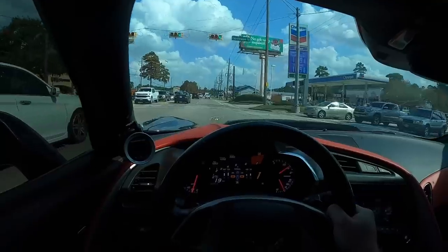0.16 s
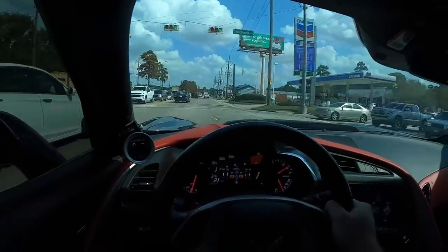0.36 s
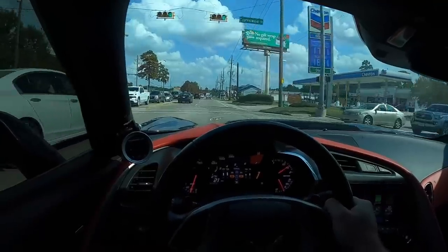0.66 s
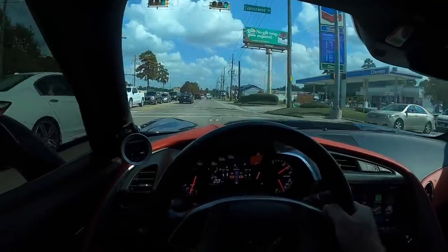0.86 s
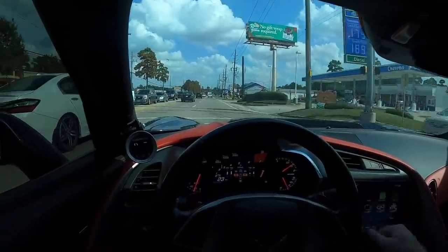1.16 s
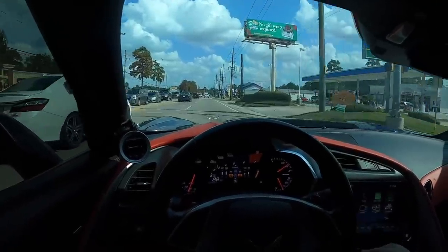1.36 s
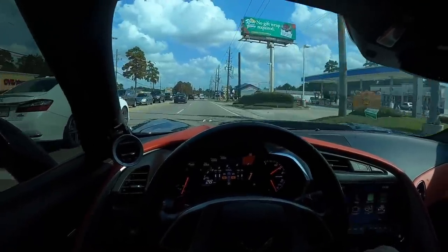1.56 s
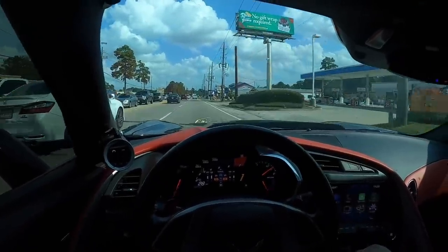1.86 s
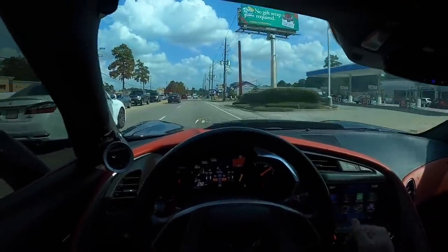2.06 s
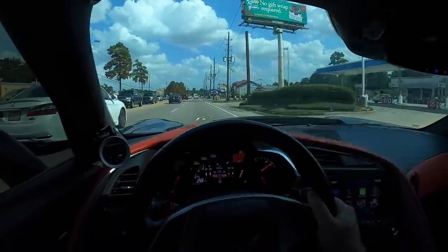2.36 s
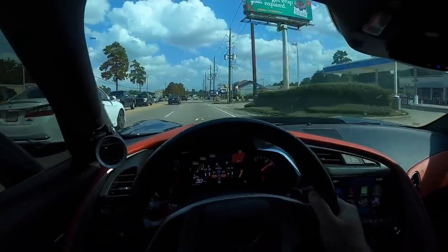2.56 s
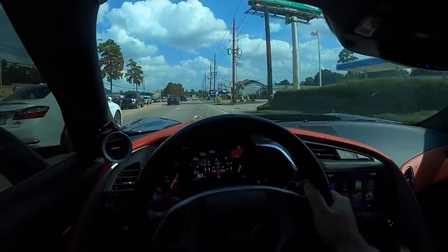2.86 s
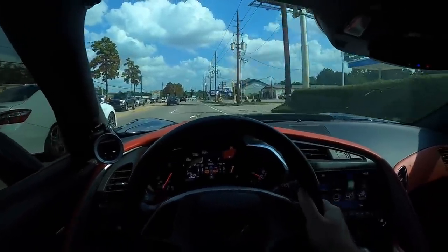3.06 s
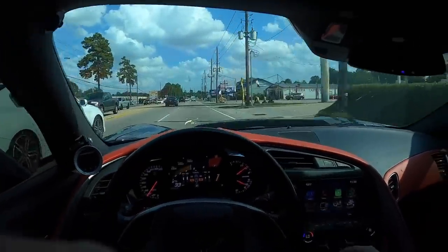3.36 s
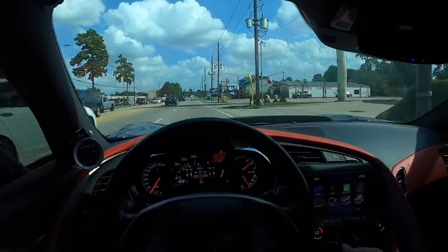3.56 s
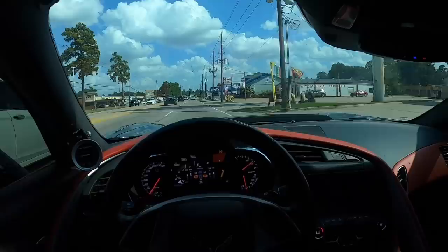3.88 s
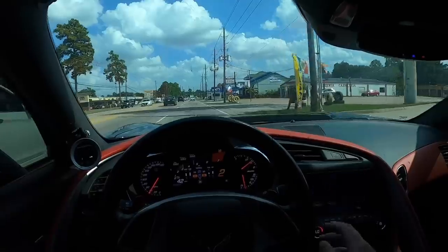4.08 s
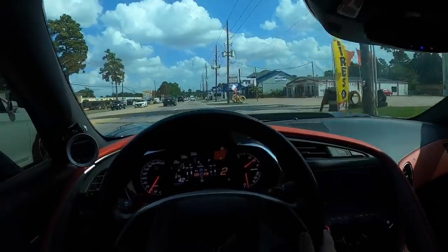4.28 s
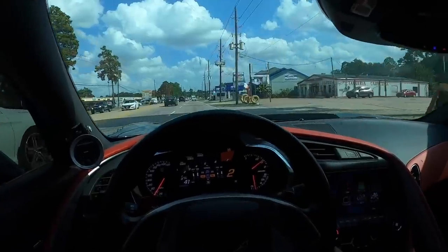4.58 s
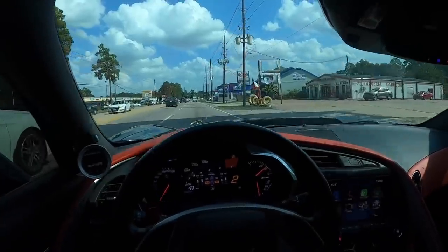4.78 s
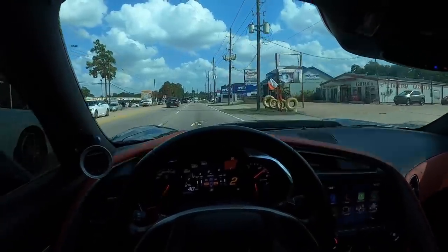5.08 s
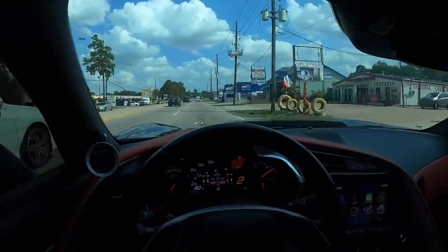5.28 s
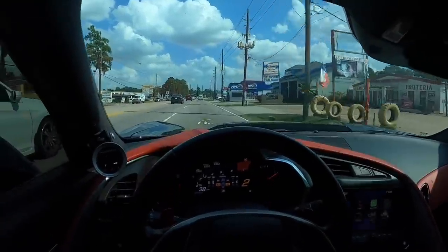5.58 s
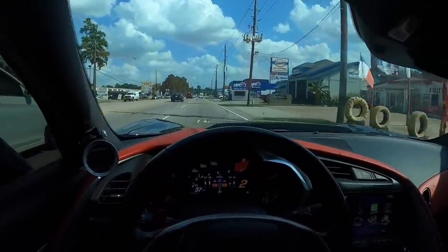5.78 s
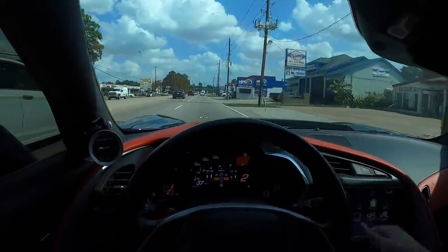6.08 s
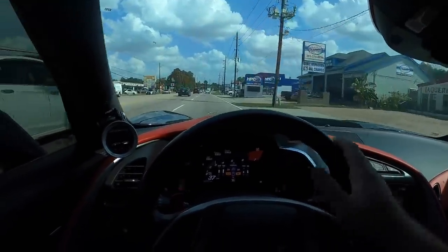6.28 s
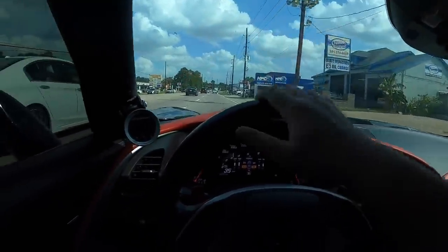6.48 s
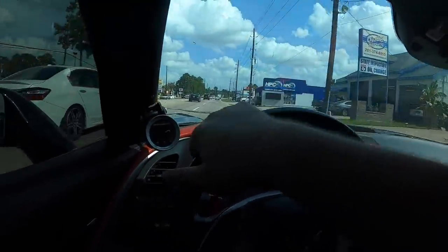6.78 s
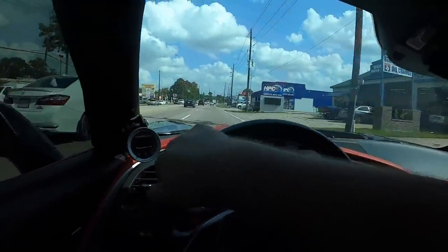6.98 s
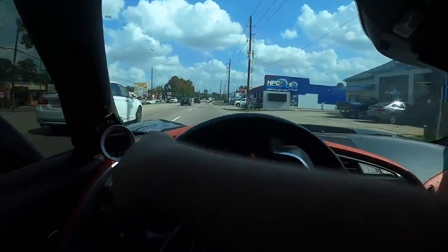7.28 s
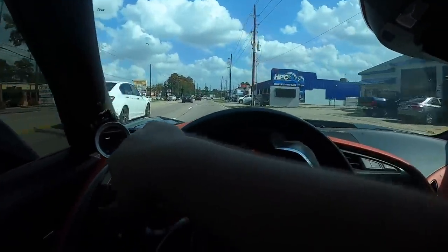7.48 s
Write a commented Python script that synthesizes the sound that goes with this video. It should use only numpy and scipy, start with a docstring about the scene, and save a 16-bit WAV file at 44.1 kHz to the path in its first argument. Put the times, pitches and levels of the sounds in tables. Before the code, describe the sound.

From inside a moving car's cabin, a deep V8 climbs steadily in pitch and breaks into a short, hard roar. It drops back for a gear change with a few muffled exhaust pops, then burbles along as it slows. Near the end it revs sharply twice in quick succession and runs down. Soft road rumble and a few faint plastic clicks sit behind the engine.

```python
"""A supercharged V8 heard from the driver's seat: it pulls in first gear, is floored, lifts off, shifts up,
coasts with a burble, gets two stabs of throttle and runs down. Exhaust pulses form engine orders that pass the
resonances of pipes and cabin, boom, and bark at full load. Each firing puffs out gas that sputters, roars and
hisses; low thuds come as the throttle shuts and the clutch takes up. Behind are blower whine, intake rush, trim
clicks, soft swishes and road rumble."""
import sys
import numpy as np
from scipy import signal
from scipy.io import wavfile
from scipy.ndimage import uniform_filter1d, minimum_filter1d

SR = 44100
rng = np.random.default_rng(int(sys.argv[2]) if len(sys.argv) > 2 else 0)


def output_pcm(signal):
    """Save a mono or channel-first signal as 16-bit PCM at the path in sys.argv[1].

    Samples are clipped to [-1, 1] before scaling.
    """
    pcm = np.clip(np.atleast_2d(signal).T, -1, 1) * 32767
    wavfile.write(sys.argv[1], SR, np.round(pcm).astype(np.int16))


N = 336968
TIME = np.arange(N) / SR
CRUISE_HZ, FIRM_THROTTLE, CYLINDER_COUNT = 190, .65, 8


def amp(db):
    """Decibels to gain."""
    return 10 ** (np.asarray(db) / 20)


def unit(x):
    """Scales to rms 1."""
    return x / np.sqrt(np.mean(abs(x) ** 2) + 1e-20)


def drift(t, rate_hz):
    """Smooth random wander, rms 1."""
    knots = signal.resample_poly(rng.standard_normal(1024), 8, 1)
    return unit(np.interp(t * rate_hz, np.linspace(0, 1024, len(knots)), knots))


def curves(rows, at):
    """A table's other columns, interpolated along its first."""
    axis, *columns = np.transpose(rows)
    return [np.interp(at, axis, column) for column in columns]


def spectrum(points, hz):
    """A (Hz, dB) table read on a log-frequency axis."""
    f, db = np.transpose(points)
    return np.interp(np.log(hz + 1), np.log(f + 1), db)


def modes_db(modes, hz):
    """Sum of bell-shaped peaks and notches."""
    return sum(db * np.exp(-.5 * ((hz - centre) / width) ** 2) for centre, width, db in modes)


def colour(x, db_at, size=16384):
    """Causal filter with gain db_at(hz)."""
    hz = abs(np.fft.fftfreq(size, 1 / SR))
    log_gain = np.log(amp(np.maximum(db_at(hz), -100)))
    response = np.fft.ifft(np.exp(np.conj(signal.hilbert(log_gain)))).real
    return signal.oaconvolve(x, response[:size // 2])[:len(x)]


def shaped(x, points):
    """Filters x by a (Hz, dB) table."""
    return colour(x, lambda hz: spectrum(points, hz))


def band_noise(n, hz, width_hz):
    """Noise through two resonators that follow hz, rms 1."""
    turn = np.exp(2j * np.pi * np.cumsum(hz * np.ones(n)) / SR)
    pole = np.exp(-np.pi * width_hz / SR)
    x = rng.standard_normal(n)
    for _ in range(2):
        x = (turn * signal.lfilter([1 - pole], [1, -pole], x / turn)).real
    return unit(x)


def bursts(events, width_hz, t60_s):
    """Decaying band noise for each (start s, dB, centre Hz)."""
    out = np.zeros(N)
    for start_s, db, hz in events:
        part = out[round(start_s * SR):][:SR // 8]
        decay = np.exp(-np.log(1000) * TIME[:len(part)] / t60_s)
        part += amp(db) * decay * band_noise(len(part), hz, width_hz)
    return out


# Throttle 0-1 at shut, light, firm, wide open.
LAW_THROTTLES = [0, .25, .65, 1]

def level_db(law, firing_hz, throttle):
    """Reads a level law: dB at cruise for the four throttles, then dB/octave of speed shut and open."""
    *levels_db, shut_slope, open_slope = law
    slope = shut_slope + (open_slope - shut_slope) * throttle
    return np.interp(throttle, LAW_THROTTLES, levels_db) + slope * np.log2(firing_hz / CRUISE_HZ)


# Each row: frequency in Hz, relative level in dB.
ROAD_SPECTRUM = [(12, -11.5), (25, 7), (45, 8.5), (70, 7.5), (150, 3.5), (400, -19.5), (1000, -51)]

def road(firing_hz, rumble_db=-42, lumpy_db=.1, shake_db_per_octave=5):
    """Tyres and body rumble over uneven pavement; a fast engine shakes the body more."""
    db = rumble_db + shake_db_per_octave * np.log2(firing_hz / CRUISE_HZ) + lumpy_db * drift(TIME, 7)
    return amp(db) * unit(shaped(rng.standard_normal(N), ROAD_SPECTRUM))


# Each row: middle in seconds, half length in seconds, level in dB.
CABIN_SWISHES = [(3.879, .035, -61), (3.996, 0.047, -58.5), (5.992, 0.041, -53), (7.181, 0.058, -60)]

def swishes():
    """Brief, smooth swells of hiss."""
    gain = sum(amp(db) * np.exp(-((TIME - mid_s) / half_s) ** 2) for mid_s, half_s, db in CABIN_SWISHES)
    return gain * band_noise(N, hz=2800, width_hz=3200)


# Each row: start in seconds, level in dB, centre in Hz.
TRIM_CLICKS = [(.19, -60, 4000), (1.862, -52.5, 5000), (2.019, -56.5, 5500), (6.817, -51, 2800),
               (7.013, -59, 3500)]

def trim():
    """Dry plastic clicks with a short cabin tail."""
    return bursts(TRIM_CLICKS, width_hz=4500, t60_s=.092)


# Each row: time in seconds, centre in Hz, level in dB.
INTAKE_SWEEP = [(.38, 1303, -62.5), (.75, 1504, -44.5), (1.0, 2500, -52), (1.3, 3880, -56.5),
                (1.7, 4250, -76.5)]
# Each row: resonance in Hz, width in Hz, gain in dB.
DUCT_MODES = [(1850, 60, 4), (2120, 82, 6), (3830, 150, 4), (6060, 1100, 5.5)]

def intake():
    """Air drawn past the throttle rises in pitch as boost builds and whistles faintly in the duct."""
    centre_hz, db = curves(INTAKE_SWEEP, TIME)
    rush = band_noise(N, centre_hz, width_hz=2600)
    return amp(db) * unit(colour(rush, lambda hz: modes_db(DUCT_MODES, hz)))


def blower(cycles, order=58.7, resonance_hz=1397, width_hz=34, whine_db=-53, spurts_db=1):
    """The supercharger's lobes whine at a multiple of engine speed, heard as they cross a resonance."""
    whine_hz = order * np.gradient(cycles) * SR
    detuning = (whine_hz - resonance_hz) / width_hz
    gain = amp(whine_db + spurts_db * drift(TIME, 15)) / np.sqrt(1 + detuning ** 4)
    return np.sqrt(2) * gain * np.sin(2 * np.pi * order * cycles + .5 * drift(TIME, 30))


# Each row: start in seconds, level before filtering in dB.
THUDS = [(3.221, -17), (3.877, -29.5), (3.92, -22), (4.062, -20), (4.188, -24)]

def thumps(centre_hz=400):
    """Low thuds as the throttle shuts and as the clutch takes up second gear."""
    thuds = bursts([(start_s, db, centre_hz) for start_s, db in THUDS], width_hz=260, t60_s=.099)
    return shaped(thuds, [(70, -22), (150, -.5), (600, 1), (1500, -14.5)])


def gas_puffs(firings, depth=.22, uneven_db=1.5):
    """Turbulence envelope: each firing lets out a puff of its own size."""
    size = amp(uneven_db * rng.standard_normal(4096))[firings.astype(int)]
    return size * (1 + depth * np.cos(2 * np.pi * (firings - .5)))


# Each row: frequency in Hz, relative level in dB.
SPUTTER_SPECTRUM = [(50, -27), (75, -15.5), (95, 10.5), (140, 4.5), (210, 5.5), (260, 5), (330, -0.5),
                    (450, -4.5), (570, -9), (700, -13.5), (1000, -61)]

def sputter(puffs, firing_hz, throttle, cruise_db=-39.5, db_per_octave=8.5, unsettled_db=17.5,
            knee_octaves_per_s=.96, lag_s=.05, stumble_db=3):
    """An engine that races up or drops back burns unevenly; off the throttle the puffs stumble."""
    octaves = np.log2(firing_hz / CRUISE_HZ)
    octaves_per_s = uniform_filter1d(abs(np.gradient(octaves)) * SR, size=6000)
    change = np.interp(TIME - lag_s, TIME, octaves_per_s) / knee_octaves_per_s
    db = cruise_db + db_per_octave * octaves + unsettled_db * np.tanh(change ** 2)
    stumble = amp(stumble_db * (1 - throttle) * drift(TIME, 35))
    return amp(db) * unit(shaped(rng.standard_normal(N) * puffs * stumble, SPUTTER_SPECTRUM))


# Each row: frequency in Hz, relative level in dB.
ROAR_SPECTRUM = [(450, -20), (680, 0), (850, 2.5), (1100, -7.5), (1300, -6), (1600, -13), (1950, -14),
                 (2300, -19.5), (3000, -34), (5000, -57)]
HISS_SPECTRUM = [(1200, -21.5), (2200, 1.5), (2900, -2), (3500, -6), (4600, -8), (5800, -15.5), (7300, -17),
                 (8500, -24), (9800, -25.5), (11000, -37.5), (12500, -42.5)]
# Each law: four levels in dB, two slopes in dB/octave; see level_db.
ROAR_LEVEL_LAW = (-48, -39.5, -43, -30, 8.5, 1.5)
HISS_LEVEL_LAW = (-61.5, -59.5, -55.5, -46, 5.5, 3)

def gas_flow(puffs, firing_hz, throttle, lag_s=.013):
    """Turbulent gas roars and hisses, following the pedal a moment late."""
    flow = np.interp(TIME - lag_s, TIME, uniform_filter1d(throttle, size=1900))
    roar = unit(shaped(rng.standard_normal(N) * puffs, ROAR_SPECTRUM))
    hiss = unit(shaped(rng.standard_normal(N) * (1.1 + puffs), HISS_SPECTRUM))
    roar_db = level_db(ROAR_LEVEL_LAW, firing_hz, flow)
    hiss_db = level_db(HISS_LEVEL_LAW, firing_hz, flow)
    return amp(roar_db) * roar + amp(hiss_db) * hiss


# Each row: multiple of the cycle rate, relative level in dB.
BARK_PARTIALS = [(22, -2.5), (24, 1), (27, -6), (30, -7.5), (32, -8.5)]
# Each row: frequency in Hz, cabin gain in dB.
BARK_RESPONSE = [(600, -0.5), (740, 1), (840, -5.5), (950, 1), (1100, 2), (1250, -15.5)]

def bark(cycles, throttle, open_db=-32.5, db_per_throttle=64.5, waver_db=3, jitter_rad=.65):
    """At full load the pressure pulses steepen and their upper orders cut through."""
    orders = np.zeros(N)
    for order, db in BARK_PARTIALS:
        gain = amp(db + waver_db * drift(TIME, 18))
        phase = jitter_rad * drift(TIME, 60) + 2 * np.pi * rng.random()
        orders += gain * np.cos(2 * np.pi * round(order) * cycles + phase)
    return np.sqrt(2) * amp(open_db - db_per_throttle * (1 - throttle)) * shaped(orders, BARK_RESPONSE)


# Each row: firing rate in Hz, coasting level in dB, level at firm throttle in dB.
FIRING_BOOM = [(120, -21, -14), (160, -19, -14), (174.4, -29, -9.5), (190.24, -33, -15.5), (205, -17, -10),
               (214, -32.5, -11), (245, -38.5, -17), (268, -24, -13), (290, -21, -12), (313, -29.5, -15.5)]
# Each row: frequency of the octave in Hz, level under load in dB.
OCTAVE_LEVELS = [(294, -27.5), (312, -17.5), (350, -16.5), (380, -27), (425, -33), (452, -20), (552, -16.5),
                 (590, -26)]

def firing_tone(firings, firing_hz, throttle, bite_throttle=.22, db_per_throttle=8, coast_waver_db=3,
                octave_coast_db=-18):
    """The note of all eight cylinders and its octave boom under load and at pipe and cabin modes."""
    pulling = np.minimum(throttle / bite_throttle, 1)
    coast_db, firm_db = curves(FIRING_BOOM, firing_hz)
    coast_db += coast_waver_db * drift(TIME, 12)
    pull_db = firm_db + db_per_throttle * (throttle - FIRM_THROTTLE)
    tone_db = (1 - pulling) * coast_db + pulling * pull_db
    octave_db = spectrum(OCTAVE_LEVELS, 2 * firing_hz) + octave_coast_db * (1 - pulling)
    tone = amp(tone_db) * (1 + .03 * drift(TIME, 40)) * np.cos(2 * np.pi * firings)
    octave = amp(octave_db) * (1 + .093 * drift(TIME, 40)) * np.sin(4 * np.pi * firings)
    return np.sqrt(2) * (tone + octave)


def driveline_shunt(clutch_s=4.04, rock_hz=7.4, depth_db=4, decay_s=.22):
    """Exhaust gain: the driveline rocks and settles as the clutch takes up second gear."""
    t = np.maximum(TIME - clutch_s, 0)
    envelope = np.minimum(2 * rock_hz * t, 1) * np.exp(-t / decay_s)
    return amp(depth_db * envelope * np.cos(2 * np.pi * rock_hz * t))


# Each row: frequency in Hz, gain in dB.
CABIN_SLOPE = [(50, -5.5), (78, -7), (92, 8.5), (125, 3.5), (175, 6), (250, 1), (320, 1.5), (400, -2.5),
               (560, -9.5), (680, -27.5), (850, -24), (1120, -23.5), (1300, -38.5), (1800, -40.5)]
# Each row: centre in Hz, width in Hz, gain in dB.
CABIN_RESONANCES = [(91.4, 8.2, 5), (114, 3.4, 1.5), (183, 42, 4), (195.2, 2.1, -3), (210.9, 11, 6.5),
                    (225.3, 14, -4), (300, 4, 2), (340, 32, 2.5), (371.1, 10, -9.5), (443, 19, 1.5),
                    (508, 17, -3.5), (557.5, 32, 4.5), (637.6, 20, 9), (743.5, 12, 8.5)]

def cabin_db(hz, soak_hz=1900):
    """Tailpipe to seat: a broad slope with resonances and notches; the trim soaks up the treble."""
    soak_db = -10 * np.log10(1 + (hz / soak_hz) ** 10)
    return spectrum(CABIN_SLOPE, hz) + soak_db + modes_db(CABIN_RESONANCES, hz)


# Each row: multiple of the cycle rate, relative dB coasting, at half load, at full load.
EXHAUST_ORDERS = [(3, -4.5, -6, -16), (4, 7.5, -12.5, -3.5), (5, 0.5, 4, -7), (6, 6, 3.5, -0.5),
                  (7, 0.5, -10, -8), (9, -2.5, -11.5, -0.5), (10, 1, -3.5, -3), (11, -6, -0.5, 1),
                  (12, 0.5, -3, 2.5), (13, -7, 4, -7), (14, -0.5, 1.5, 10.5), (15, -2, -7.5, 0),
                  (17, 0.5, -4.5, -2.5), (18, -1, 2, -0.5), (19, -1.5, 3, -4.5), (20, -6.5, 0, 4),
                  (21, -2, -2.5, -0.5), (22, -1, 1.5, 4), (23, 0, 2.5, 0), (24, -6.5, 1.5, 5.5)]
# Each entry: one cylinder's pulse in dB, in firing order.
CYLINDER_PULSES_DB = [-0.5, -5, 0, -5, -3.5, 0, -5.5, -1]
# Low orders burble, high ones rasp. Each law: four levels in dB, two slopes in dB/octave.
BURBLE_LEVEL_LAW = (-37.5, -36.5, -34.5, -35.5, 2, 8.5)
RASP_LEVEL_LAW = (-39, -30.5, -31.5, -28, 13.5, -8)

def exhaust(cycles, firing_hz, throttle, top_order=72, snarl_db=5, between_db=-2, fading_db=3.5,
            coast_dull_db=4, scatter_rad=.008, smear_rad=.14, flutter_hz=12, decimation=6):
    """Engine orders from each bank's uneven pulses, heard through the cabin; high ones flutter more."""
    t, cycles, firing_hz, throttle = (x[::decimation] for x in (TIME, cycles, firing_hz, throttle))
    burble_db = level_db(BURBLE_LEVEL_LAW, firing_hz, throttle)
    rasp_db = level_db(RASP_LEVEL_LAW, firing_hz, throttle)
    load = np.minimum(throttle / FIRM_THROTTLE, 1)
    # Combustion is less even off the throttle, and the note tears wide open.
    roughness = .0065 + .016 * (1 - load) + .055 * np.maximum(throttle - FIRM_THROTTLE, 0)
    pulse_phases = np.angle(np.fft.fft(amp(CYLINDER_PULSES_DB)))
    listed_db = {round(order): row for order, *row in EXHAUST_ORDERS}
    out = np.zeros(len(t))
    for order in range(3, top_order + 1):
        if order in (8, 16):  # played by firing_tone
            continue
        hz = order * firing_hz / CYLINDER_COUNT
        loaded_db = snarl_db if order % CYLINDER_COUNT in (0, 6) else between_db
        db = np.interp(load, [0, .5, 1], listed_db.get(order, (-3, loaded_db, loaded_db)))
        rasp_share = np.interp(np.log(hz), np.log([200, 500]), [0, 1])
        db += burble_db + rasp_share * (rasp_db - burble_db + fading_db * drift(t, 4))
        db -= coast_dull_db * (1 - load) * np.interp(hz, [600, 1000], [0, 1])  # blunt coasting pulses
        phase = pulse_phases[order % CYLINDER_COUNT] + scatter_rad * order ** 2 * rng.standard_normal()
        phase -= smear_rad * order ** 2  # long pipes smear each pulse over the cycle
        depth = order * roughness
        wander = drift(t, flutter_hz) + 1j * drift(t, flutter_hz)
        flutter = (1 + depth * wander) / np.sqrt(1 + depth ** 2)
        out += np.sqrt(2) * amp(db) * (flutter * np.exp(1j * (2 * np.pi * order * cycles + phase))).real
    return colour(signal.resample_poly(out, decimation, 1)[:N], cabin_db)


# Each row: time in seconds, throttle 0-1.
FIRST_GEAR_PULL = [(0, 0.18), (.85, 0.29), (1.55, 0.61), (2.5, .66), (2.77, 1), (2.95, 0.95), (3.09, 1),
                   (3.2, 0.96), (3.255, 0.05)]
# Each row: start in seconds, time until release in seconds, added throttle 0-1.
PEDAL_STABS = [(3.98, 0.074, 0.13), (6.026, .174, 0.95), (6.294, .046, .72)]

def pedal(down_s=.032, up_s=.022):
    """Throttle opening: the long pull, then stabs that rise, hold and fall."""
    throttle = curves(FIRST_GEAR_PULL, TIME)[0]
    for start_s, held_s, opening in PEDAL_STABS:
        rise = (TIME - start_s) / down_s
        fall = 1 - (TIME - start_s - held_s) / up_s
        throttle += opening * np.clip(np.minimum(rise, fall), 0, 1)
    return np.clip(throttle, 0, 1)


# Each row: time in seconds, firing rate in Hz.
ENGINE_SPEED = [(0, 139.2), (1.0, 169.4), (1.45, 185.2), (1.9, 196.5), (2.16, 209.7), (2.6, 224.5),
                (2.72, 234.2), (3.12, 313.3), (3.23, 320), (3.35, 268), (3.5, 251.6), (4.0, 202),
                (4.3, 186.3), (4.4, 190.9), (4.6, 185.8), (5.8, 167.9), (6.045, 153), (6.19, 228.5),
                (6.25, 216.4), (6.36, 223.1), (7.05, 161), (7.64, 115.5)]

def scene():
    """Engine speed sets the pitch of exhaust and blower; the throttle sets how hard the engine sounds."""
    firing_hz, throttle = curves(ENGINE_SPEED, TIME)[0], pedal()
    firings = np.cumsum(firing_hz) / SR
    cycles = firings / CYLINDER_COUNT
    pipes = exhaust(cycles, firing_hz, throttle) + firing_tone(firings, firing_hz, throttle)
    pipes += bark(cycles, throttle)
    puffs = gas_puffs(firings)
    gas = sputter(puffs, firing_hz, throttle) + gas_flow(puffs, firing_hz, throttle)
    engine = driveline_shunt() * pipes + gas + blower(cycles) + intake() + thumps()
    return (engine + trim() + swishes() + road(firing_hz))[None]


def record(dry):
    """Peak limiter, then low-pass."""
    ceiling, hold_samples, cutoff_hz = .8, 441, 11600
    gain = ceiling / np.maximum(abs(dry[0]), ceiling)
    gain = uniform_filter1d(minimum_filter1d(gain, hold_samples), hold_samples)
    lowpass = signal.firwin(255, cutoff_hz, window=("kaiser", 9), fs=SR)
    return signal.oaconvolve(dry * gain, lowpass[None], "same")


dry = scene()
out = record(dry)
output_pcm(out)
```